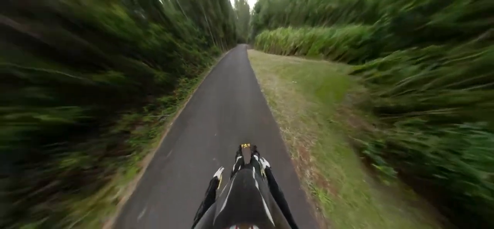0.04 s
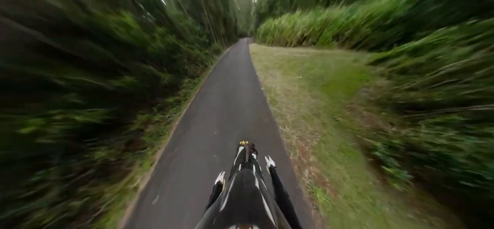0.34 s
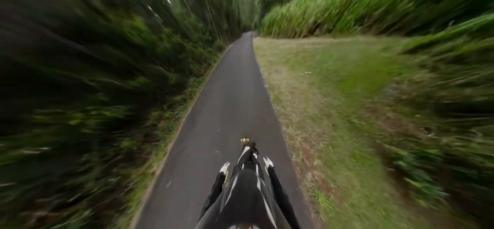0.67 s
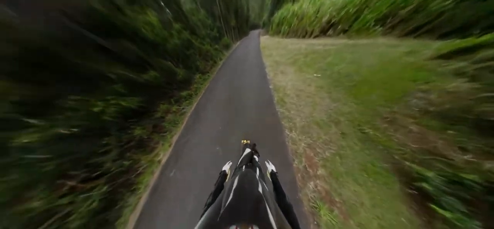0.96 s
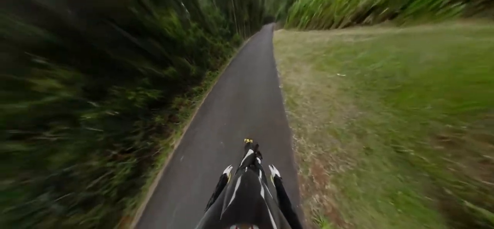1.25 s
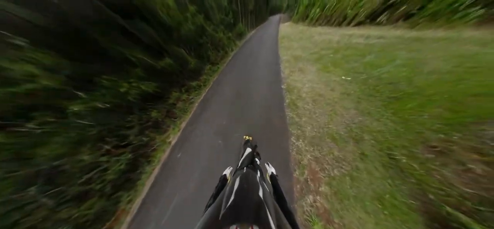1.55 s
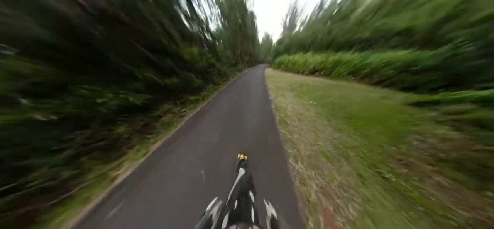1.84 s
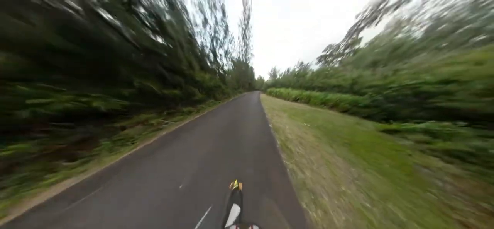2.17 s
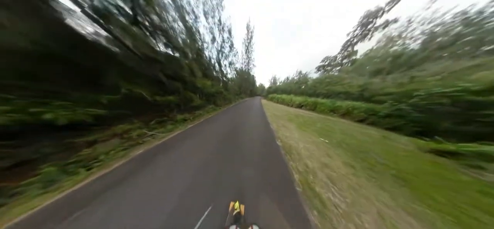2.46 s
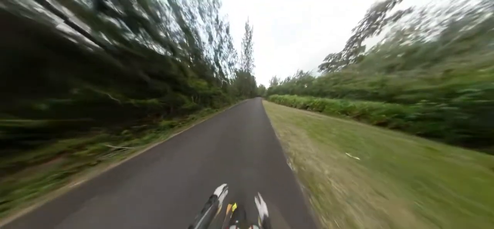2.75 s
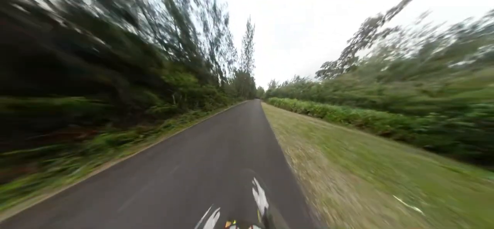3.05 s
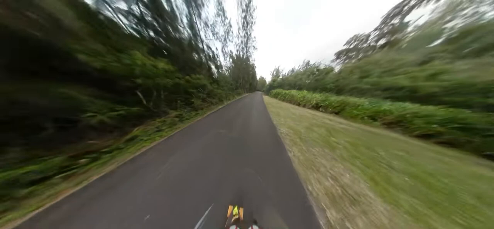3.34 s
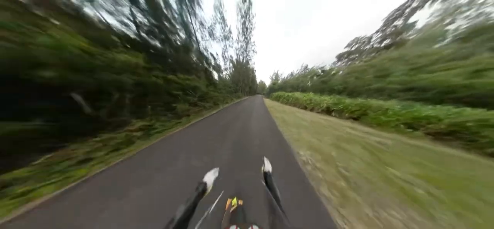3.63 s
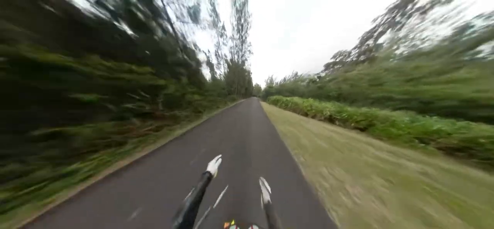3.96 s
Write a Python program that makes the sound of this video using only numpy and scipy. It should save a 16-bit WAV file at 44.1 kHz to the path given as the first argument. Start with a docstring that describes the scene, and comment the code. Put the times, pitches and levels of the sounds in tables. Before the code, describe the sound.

Gear on a wheeled board knocks sharply at about 0.3 and 0.7 seconds, with small rattles, scuffs and faint suit creaks, over a soft roar of wheels on asphalt. Light clicks follow around 1.5 seconds. At 2 seconds a hard, bright snap sounds beside the microphone. Wind then rises in gusts, with low buffeting, brief hollow hoots and a few ticks, strongest from 3.4 to 4 seconds.

```python
"""A rider lies on a wheeled board and coasts down a paved road, heard from a camera on the rider.
From the start the wheels roar softly on the asphalt. At 0.33 s and 0.66 s the board jolts: the gear
knocks and scuffs, the suit creaks, and after the second jolt the hollow board hums.
Two thin gusts pass, and at 2 s a hard snap sounds beside the camera. From there the wind rises:
it rushes over the camera, buffets the microphone ports and makes the hollows of the mount hoot."""
import sys
import numpy as np
from scipy import signal
from scipy.fft import rfft, irfft
from scipy.io import wavfile

SR = 44100
rng = np.random.default_rng(int(sys.argv[2]) if len(sys.argv) > 2 else 0)


def to_wav(sig):
    """Store sig (one row per channel, or 1-D mono) as 16-bit WAV at the path in sys.argv[1].

    Samples outside -1..1 are clipped; the rate is SR.
    """
    pcm = np.clip(np.atleast_2d(sig), -1, 1) * 32767
    pcm = np.round(pcm).astype(np.int16)
    wavfile.write(sys.argv[1], SR, pcm.T)  # frames by channels


N = 176400
T = np.arange(N) / SR
HZ = np.maximum(np.arange(N // 2 + 1) * SR / N, 1)

# wind over the camera: time_s, level_db
RUSH_LEVEL = [(0, -69.5), (1.7, -72.5), (1.86, -58), (1.96, -56.5), (2.01, -52), (2.14, -61), (2.3, -57.5),
              (2.512, -57), (2.525, -48.5), (2.585, -50.5), (2.65, -46.5), (2.72, -53), (2.8, -48.5),
              (2.86, -58.5), (2.9, -52), (3.02, -53), (3.06, -49), (3.14, -50.5), (3.31, -48),
              (3.35, -43.5), (3.43, -42), (3.52, -43.5), (3.62, -43.5), (3.67, -46.5), (3.8, -45),
              (3.86, -49.5), (3.915, -38.5), (4, -41)]
# freq_hz, relative_db
RUSH_SPECTRUM = [(60, -47), (150, -18), (270, -12.5), (338, -0.5), (400, -5.5), (500, 3), (620, -0.5),
                 (765, 0), (933, -6.5), (1140, -4), (1300, -11.5), (1690, -7.5), (2100, -18.5),
                 (2600, -22.5), (4000, -26), (7000, -34.5), (15000, -67)]
# freq_hz, left_right_correlation
RUSH_CORRELATION = [(130, 0.99), (300, 0.98), (640, 0.95), (1400, 0.74), (3100, 0.57), (7000, 0.25)]
# short gusts in the rush: time_s, level_db, sigma_s
RUSH_GUSTS = [(2.68, -51.5, .01), (3.085, -46.5, 0.012), (3.795, -55, 0.013), (3.868, -42.5, 0.0041)]
# raspy top of the wind: time_s, level_db
RASP_LEVEL = [(0, -81), (2.4, -72.5), (2.55, -61), (2.66, -55), (2.87, -90), (3.03, -64), (3.07, -53.5),
              (3.13, -67), (3.23, -56), (3.3, -57.5), (3.45, -45.5), (3.55, -52), (3.61, -49.5),
              (3.68, -53.5), (3.76, -50), (3.81, -44.5), (3.86, -55), (3.96, -43), (4, -52)]
# freq_hz, relative_db
RASP_SPECTRUM = [(400, -30), (1000, -24.5), (1300, 0), (1650, 2.5), (2050, -2.5), (2500, -14.5),
                 (4000, -23), (9000, -66)]
# hooting hollows of the mount: time_s, level_db, sigma_s, pitch_hz, half_width_hz
MOUNT_HOOTS = [(2.565, -50.5, 0.0094, 1700, 100), (2.645, -47, 0.025, 679, 110),
               (2.91, -53.5, 0.013, 726, 80), (3.228, -53, 0.0075, 1820, 140), (3.345, -46, 0.014, 778, 36),
               (3.535, -46.5, 0.019, 603, 35), (3.8, -48, 0.025, 554, 12), (3.93, -42.5, 0.03, 495, 43),
               (3.97, -43.5, 0.014, 589, 24)]
# turbulence on the ports: time_s, level_db
BUFFET_LEVEL = [(0, -84), (.9, -94), (1.1, -84), (1.7, -89), (2.0, -75.5), (2.26, -61), (2.42, -66),
                (2.8, -56), (2.96, -55), (3.2, -55), (3.42, -57), (3.55, -49.5), (3.7, -50.5), (4, -51.5)]
# freq_hz, relative_db
BUFFET_SPECTRUM = [(20, -18), (40, -7), (80, -1.5), (150, 2), (260, 2.5), (400, -1.5), (800, -7.5),
                   (1700, -20.5), (3000, -32), (10000, -92)]
# freq_hz, left_right_correlation
BUFFET_CORRELATION = [(60, -.05), (400, 0.22)]
# single buffets: time_s, level_db, sigma_s, centre_hz, half_width_hz
PORT_PUFFS = [(1.659, -69.5, 0.004, 150, 120), (2.255, -60.5, 0.014, 162, 150),
              (3.06, -47.5, 0.006, 135, 54.6), (3.52, -49.5, .012, 230, 60), (3.58, -51, .014, 119, 80)]

# board and gear knocks: start_s, level_db, tilt_db_per_oct, cutoff_hz, rattle_db, decay_s, bass_db, ring_hz
GEAR_KNOCKS = [(0.262, -41.5, -18.5, 3000, 4, 0.0052, -1.5, 250),
               (0.334, -8.5, 4, 2530, -4.5, 0.005, -1, 1490),
               (0.3361, -14, -1.5, 2800, -2.5, 0.008, 2, 502), (.3650, -26.5, -3, 2500, 0, 0.0038, 0, 700),
               (.3935, -24, -3, 3000, -3, .004, 13, 303), (.4470, -32, 8, 3500, 0, 0.0018, 2, 2600),
               (0.46, -31.5, 3, 4000, -11, .002, 2, 2440), (0.577, -29.5, 5, 3770, 1.5, 0.0064, 0, 2580),
               (0.659, -15, 0, 11000, 0.5, 0.0032, 4, 600), (.6594, -8.5, 0, 7000, -13, 0.0071, -5, 950),
               (0.6669, -15.5, 4.5, 12000, -4, 0.0048, -2, 1335),
               (0.6687, -24, 5, 12000, -1, 0.0046, 12, 1870), (0.7299, -18.5, 4, 3970, 0, 0.0033, 12, 3100),
               (.79, -34, 3, 3500, -3, 0.0022, 0, 2300), (1.518, -36.5, 4, 9000, 8, 0.0047, -5, 730),
               (1.531, -31, 3.5, 9100, 7, 0.003, -6, 730), (1.6270, -41.5, 10, 12000, 1, 0.0033, 0, 2030),
               (1.74, -36.5, 0.5, 1170, 11, 0.0098, -11, 740),
               (2.0160, -31, 0.5, 1600, 8.5, 0.0035, -6, 503), (2.521, -32, 5, 12000, 9, 0.011, 5, 1210),
               (3.005, -38, 7.5, 14000, 10, 0.0022, 0, 3060), (3.5900, -35, 6, 12000, -1, .004, 0, 3480),
               (3.7250, -34, 7, 12000, 7, 0.0033, 0, 3000)]
# gear rubbing, plus two short, thin wind gusts just before the snap (last two rows):
# start_s, level_db, attack_s, hold_s, decay_s, tilt_db_per_oct, bass_db
SCUFFS_AND_GUSTS = [(0.36, -46, 0.0026, 0.019, 0.013, -0.5, 6),
                    (0.385, -44.5, 0.0057, 0.014, 0.014, -.5, 15), (0.413, -50, .004, .005, 0.0037, -5, -6),
                    (0.435, -59.5, .005, 0.024, 0.054, 0.5, 16.5),
                    (0.556, -59.5, 0.0017, 0.01, 0.008, 1, -9), (0.647, -43, 0.002, 0.005, 0.004, 3, 3),
                    (0.657, -44.5, 0.002, 0.008, 0.017, 6, 10),
                    (0.653, -38.5, 0.0025, 0.012, 0.0033, 1, -1),
                    (0.683, -54, 0.0036, 0.018, 0.0064, -4, -2),
                    (0.71, -47.5, 0.0037, 0.0085, .004, -1.5, 6),
                    (0.723, -42.5, 0.002, 0.0083, 0.0074, 0.5, 16),
                    (0.739, -45.5, 0.0036, 0.017, 0.013, -3, 5),
                    (0.93, -63.5, .003, 0.025, 0.0064, 2.5, -8),
                    (1.873, -53.5, 0.0038, 0.019, 0.0061, -4, -14),
                    (1.913, -52.5, 0.0068, 0.0078, .008, -5, -12)]
# resonances of the rubbed parts: centre_hz, width_hz, gain_db
SCUFF_RESONANCES = [(2330, 140, 2), (3100, 330, -0.5), (3900, 610, 6)]
# response of board and gear: freq_hz, relative_db
GEAR_SPECTRUM = [(50, -69), (110, -27.5), (200, -14), (330, -8.5), (540, 5), (900, 1.5), (1300, 1.5),
                 (1850, 2), (2900, -8.5), (4000, -14.5), (5500, -21.5), (8000, -28), (12000, -29.5),
                 (16000, -47)]
# freq_hz, left_right_correlation
GEAR_CORRELATION = [(150, 0.99), (600, 0.95), (2000, 0.98), (8000, 0.46)]
# snap and rebounds: start_s, level_db
SNAP_PULSES = [(1.9968, -3.5), (1.9975, -19), (1.9999, -23), (2.0008, -24)]
# port ducts as the snap excites them: freq_hz, left_relative_db, right_relative_db
DUCT_SPECTRA = [(300, -41, -41), (2000, -15, -20), (3720, -17.5, -5), (4570, -15, -13), (5500, 1.5, -11),
                (6900, -11, 8), (8300, 7.5, 8.5), (9900, -6, 5.5), (11000, -23, -12), (11200, -4.5, -9),
                (13900, -12, -2), (14900, -18, -1), (16000, -28, -23)]
# hollow board after a jolt: time_s, level_db, sigma_s, pitch_hz, half_width_hz
BOARD_HUMS = [(.684, -51, .005, 670, 50), (.699, -51, 0.0078, 685, 49.7), (.746, -45, 0.0069, 684, 45),
              (.769, -52, .005, 656, 45)]

# wheels on asphalt: time_s, level_db
WHEEL_LEVEL = [(0, -58), (.12, -64.5), (.3, -63.5), (.48, -61.5), (.62, -61.5), (.85, -62.5), (1.05, -66),
               (1.42, -64.5), (1.68, -63), (2.1, -65), (4, -76)]
# freq_hz, relative_db
WHEEL_SPECTRUM = [(30, -29.5), (60, -22), (120, -25.5), (280, -20.5), (370, -12), (470, -5), (590, -1.5),
                  (720, -2.5), (880, -4), (1200, -9), (1550, -15.5), (1900, -12), (2700, -22.5),
                  (4000, -50), (8000, -60.5)]
# freq_hz, left_right_correlation
WHEEL_CORRELATION = [(100, 0.37), (300, 0.9), (700, 0.85), (2000, 0.27), (5000, .4)]
# suit creaking as the rider shifts: time_s, level_db, sigma_s
SUIT_CREAKS = [(0.311, -69.5, 0.017), (0.415, -63, 0.01), (0.459, -71, .014), (0.583, -65, 0.003),
               (0.788, -65, 0.0047), (.938, -60, 0.0094), (.96, -64, .005), (1.903, -83, 0.053),
               (2.048, -66.5, 0.059), (2.32, -71, 0.088), (3.588, -55.5, 0.0067)]
# fabric swishes: time_s, level_db, sigma_s, centre_hz, half_width_oct
FABRIC_SWISHES = [(2.912, -61, 0.01, 12200, 0.13), (2.946, -61.5, 0.0063, 7600, 0.36),
                  (2.971, -67, 0.0045, 9900, 0.34), (3.549, -58, 0.0042, 9500, .04)]
# hiss of air and grit: time_s, level_db
HISS_LEVEL = [(0, -69.5), (.3, -70.5), (.75, -68), (1.05, -73), (1.45, -73), (1.6, -70), (1.75, -73),
              (1.98, -71.5), (2.06, -65.5), (2.2, -71), (2.38, -70), (2.58, -65), (2.8, -69), (3.3, -66.5),
              (3.57, -59.5), (3.67, -65), (4, -61)]
# freq_hz, relative_db
HISS_SPECTRUM = [(1000, -8), (3000, 3.5), (5500, -1.5), (7000, -2.5), (10000, -4.5), (12200, -3),
                 (14000, -10.5), (16000, -7.5)]
# freq_hz, left_right_correlation
HISS_CORRELATION = [(3000, 0.13), (12000, 0.025)]
# hollow camera housing and mount: centre_hz, width_hz, gain_db
HOUSING_RESONANCES = [(318.5, 13.6, 3.5), (513, 6, 0.5), (582, 8.3, 2), (1150, 16, 4), (1450, 25, 1),
                      (1630, 23, -0.5), (2700, 23, -4.5), (3790, 64, -3.5), (5470, 140, 3)]


def wind():
    """Air rushes over the camera, with short gusts and a raspy top."""
    rush = turbulence(RUSH_SPECTRUM, RUSH_CORRELATION, shared_db=1.5, octave_db=1.56, flutter_hz=69)
    rasp = turbulence(RASP_SPECTRUM, RUSH_CORRELATION, shared_db=2.5, octave_db=2.5, flutter_hz=55)
    rush_gain = np.hypot(level(RUSH_LEVEL), swells(RUSH_GUSTS))
    return (rush_gain * rush + level(RASP_LEVEL) * rasp) * pan(-2.5)


def hoots():
    """Strong gusts briefly sound the hollows of the mount."""
    return resonant_swells(MOUNT_HOOTS) * pan(-2.5)


def buffeting():
    """Low turbulence and single puffs, nearly independent at each port."""
    puffs = np.vstack([resonant_swells(PORT_PUFFS), resonant_swells(PORT_PUFFS)])
    rumble = turbulence(BUFFET_SPECTRUM, BUFFET_CORRELATION, shared_db=0.5, octave_db=2.5, flutter_hz=35)
    return (puffs + level(BUFFET_LEVEL) * rumble) * pan(-4)


def knocks(ring_width_hz=130, ring_db=8):
    """A cushioned pulse into the gear, then a dying rattle; the struck part rings."""
    rattle = spread(rng.standard_normal((2, N)), GEAR_CORRELATION)
    out = 0
    for start_s, level_db, tilt_db_per_oct, cutoff_hz, rattle_db, decay_s, bass_db, ring_hz in GEAR_KNOCKS:
        envelope = (T > start_s) * np.exp(-abs(T - start_s) / decay_s)
        unit_energy = np.sqrt(2 / (decay_s * SR))
        force = rattle * envelope * unit_energy * from_db(rattle_db)
        force[:, int(start_s * SR)] += 1
        cushion_db = -10 * np.log10(1 + (HZ / cutoff_hz) ** 4)
        part_db = peaks_db([(ring_hz, ring_width_hz, ring_db)])
        out += from_db(level_db) * colour(force, gear_db(tilt_db_per_oct, bass_db) + cushion_db + part_db)
    return out


def scuffs_and_gusts(grains_per_s=2200, scatter_db=2.5):
    """Grainy bursts: gear rubbing, plus two short, thin wind gusts just before the snap."""
    grains = (rng.random((2, N)) < grains_per_s / SR) * rng.choice([-1, 1], (2, N))
    strength = from_db(scatter_db * np.minimum(rng.exponential(1, (2, N)), 3))
    noise = unit_rms(spread(grains * strength, GEAR_CORRELATION))
    out = 0
    for start_s, level_db, attack_s, hold_s, decay_s, tilt_db_per_oct, bass_db in SCUFFS_AND_GUSTS:
        rise = np.clip((T - start_s) / attack_s, 0, 1)
        fall = np.exp(-np.maximum(T - start_s - attack_s - hold_s, 0) / decay_s)
        shape_db = gear_db(tilt_db_per_oct, bass_db) + peaks_db(SCUFF_RESONANCES)
        out += from_db(level_db) * colour(noise * rise * fall, shape_db)
    return out


def snap():
    """A bright click with rebounds, coloured by each port's own duct."""
    force = np.zeros(N)
    for start_s, level_db in SNAP_PULSES:
        force[int(start_s * SR)] += from_db(level_db)
    ducts = np.array(DUCT_SPECTRA)
    left_db, right_db = at_hz(ducts[:, [0, 1]]), at_hz(ducts[:, [0, 2]])
    return np.vstack([colour(force, left_db), colour(force, right_db)]) * pan(-4.2)


def hums():
    """The hollow board resonates after the second jolt."""
    return resonant_swells(BOARD_HUMS)


def wheels():
    """Soft roar of wheels rolling on asphalt."""
    roar = turbulence(WHEEL_SPECTRUM, WHEEL_CORRELATION, shared_db=0.6, octave_db=2, flutter_hz=29.2)
    return level(WHEEL_LEVEL) * roar * pan(-2.5)


def creaks(grains_per_s=1100, low_hz=2020, high_hz=4220, decay_cycles=4):
    """The suit sticks and slips; each grain rings briefly at one of 12 pitches."""
    pitches_hz = np.geomspace(low_hz, high_hz, 12)
    onsets = rng.random((len(pitches_hz), N)) < grains_per_s / len(pitches_hz) / SR
    grains = onsets * rng.standard_normal(N)
    out = 0
    for clicks, pitch_hz in zip(grains, pitches_hz):
        radius = np.exp(-pitch_hz / decay_cycles / SR)
        angle_rad = 2 * np.pi * pitch_hz / SR
        out += signal.lfilter([1, 0, -1], [1, -2 * radius * np.cos(angle_rad), radius ** 2], clicks + 1e-18)
    return unit_rms(out) * swells(SUIT_CREAKS)


def swishes():
    """Fabric friction: short swells of high, narrow noise."""
    noise = spread(rng.standard_normal((2, N)), GEAR_CORRELATION)
    out = 0
    for time_s, level_db, sigma_s, centre_hz, half_width_oct in FABRIC_SWISHES:
        shape_db = -20 * np.log10(1 + (np.log2(HZ / centre_hz) / half_width_oct) ** 2)
        out += from_db(level_db) * colour(noise * swell(time_s, sigma_s), shape_db)
    return out


def hiss():
    """Fine hiss of air and grit."""
    noise = turbulence(HISS_SPECTRUM, HISS_CORRELATION, shared_db=0.5, octave_db=-1.6, flutter_hz=39.4)
    return level(HISS_LEVEL) * noise * pan(-2)


def road_echo(x, delay_s=0.0036, gain_db=-19):
    """Adds one weak, early reflection off the asphalt."""
    return x + from_db(gain_db) * irfft(rfft(x) * np.exp(-2j * np.pi * HZ * delay_s), N)


def gear_db(tilt_db_per_oct, bass_db, thud_hz=270):
    """Gear response, tilted about 1 kHz by contact hardness, with a low thud band."""
    octaves = np.log2(np.maximum(HZ, 100) / 1000)
    thud = np.exp(-2 * np.log2(HZ / thud_hz) ** 2)
    return at_hz(GEAR_SPECTRUM) + tilt_db_per_oct * octaves + bass_db * thud


def turbulence(spectrum, correlation, shared_db, octave_db, flutter_hz):
    """Stereo noise whose octaves flutter partly together, partly alone; rms 1."""
    noise = spread(rng.standard_normal((2, N)), correlation)
    bins = rfft(noise) * from_db(at_hz(spectrum))
    octave = np.clip(np.log2(HZ / 62.5), 0, 8)
    together_db = shared_db * drift(flutter_hz)
    out = 0
    for k in range(9):
        band = irfft(bins * np.maximum(1 - abs(octave - k), 0), N)
        out += band * from_db(together_db + octave_db * drift(flutter_hz))
    return unit_rms(out)


def resonant_swells(table, flutter_db=2.5, flutter_hz=37):
    """One swelling resonance per row; pitch wanders, level flutters."""
    flutter = from_db(flutter_db * drift(flutter_hz))
    out = 0
    for time_s, level_db, sigma_s, centre_hz, half_width_hz in table:
        tone = unit_rms(narrow_noise(centre_hz, half_width_hz) * flutter)
        out += from_db(level_db) * swell(time_s, sigma_s) * tone
    return out


def narrow_noise(centre_hz, half_width_hz):
    """Narrow noise band with its level evened out; rms 1."""
    band = 1 / (1 + ((HZ - centre_hz) / half_width_hz) ** 4)
    noise = irfft(rfft(rng.standard_normal(N)) * band, N)
    evened = np.cos(np.angle(signal.hilbert(noise)))
    return unit_rms(irfft(rfft(evened) * band, N))


def colour(x, shape_db):
    """Minimum-phase filter; keeps the power of white noise."""
    cepstrum = irfft(np.log(unit_rms(from_db(shape_db)) + 1e-7), N)
    cepstrum[1:N // 2] *= 2
    cepstrum[N // 2 + 1:] = 0
    response = irfft(np.exp(rfft(cepstrum)), N)[:N // 10]
    return signal.oaconvolve(np.atleast_2d(x), response[None], axes=1)[:, :N]


def spread(pair, correlation):
    """Two independent signals to correlated left and right."""
    alike = np.clip(at_hz(correlation), -.99, .99)
    mid, side = rfft(pair)
    return irfft(np.sqrt((1 + alike) / 2) * mid + np.sqrt((1 - alike) / 2) * side * [[1], [-1]], N)


def drift(rate_hz):
    """Low-passed noise; rms 1."""
    return unit_rms(irfft(rfft(rng.standard_normal(N)) / (1 + (HZ / rate_hz) ** 2), N))


def peaks_db(table):
    """Resonance peaks and dips over frequency."""
    return sum(gain_db / (1 + (2 * (HZ - centre_hz) / width_hz) ** 2)
               for centre_hz, width_hz, gain_db in table)


def swell(time_s, sigma_s):
    """Gaussian envelope, height 1."""
    return np.exp(-.5 * ((T - time_s) / sigma_s) ** 2)


def swells(table):
    """Sum of Gaussian envelopes."""
    return sum(from_db(level_db) * swell(time_s, sigma_s) for time_s, level_db, sigma_s in table)


def level(curve):
    """Gain over time, interpolated in dB."""
    return from_db(np.interp(T, *np.transpose(curve)))


def at_hz(points):
    """Table interpolated over log frequency."""
    freq_hz, value = np.transpose(points)
    return np.interp(np.log(HZ), np.log(freq_hz), value)


def pan(left_minus_right_db):
    """Left and right gains."""
    return from_db([[left_minus_right_db / 2], [-left_minus_right_db / 2]])


def from_db(db):
    """Decibels to gain."""
    return 10 ** (np.asarray(db) / 20)


def unit_rms(x):
    """Scale to rms 1."""
    return x / np.sqrt(np.mean(x ** 2) + 1e-20)


def scene():
    """Wheels, wind and gear ring in the housing; the snap bypasses it."""
    events = road_echo(knocks() + scuffs_and_gusts() + hums() + swishes() + creaks()) * pan(-2)
    outside = events + wheels() + wind() + buffeting() + hiss() + hoots()
    return colour(outside, peaks_db(HOUSING_RESONANCES)) + snap()


def record(dry, cutoff_hz=16100):
    """Steep low-pass."""
    return signal.sosfilt(signal.ellip(10, .1, 80, cutoff_hz, fs=SR, output="sos"), dry)


dry = scene()
out = record(dry)
to_wav(out)
```